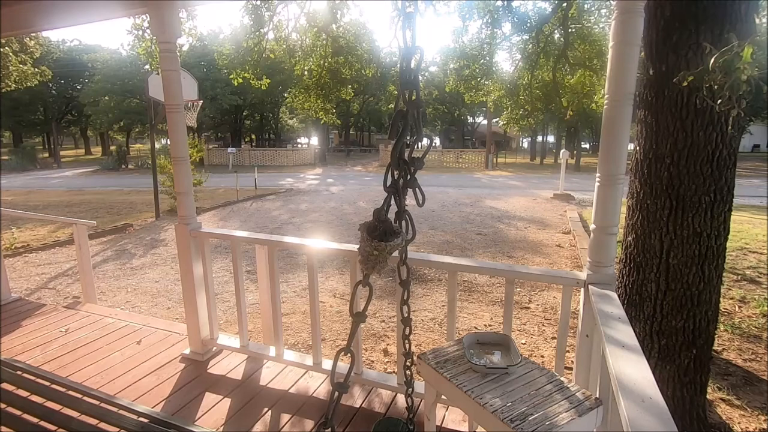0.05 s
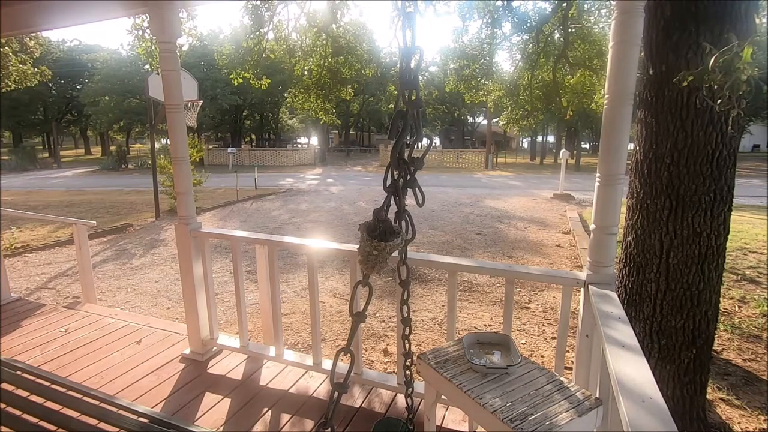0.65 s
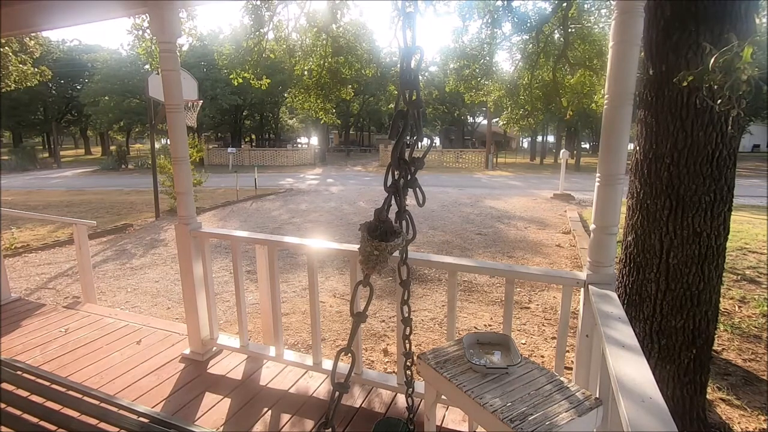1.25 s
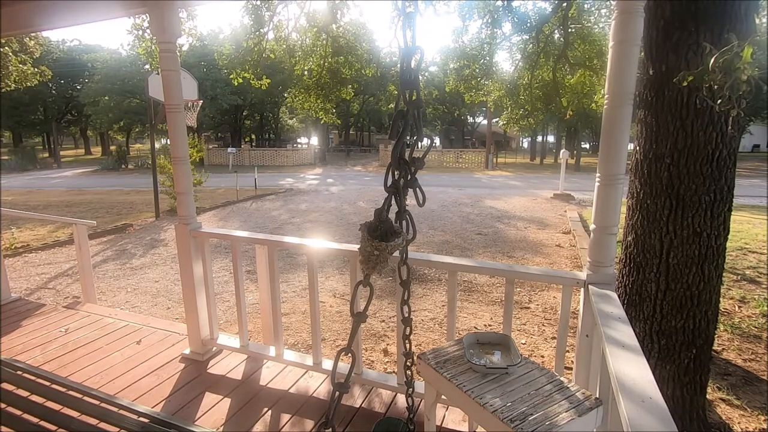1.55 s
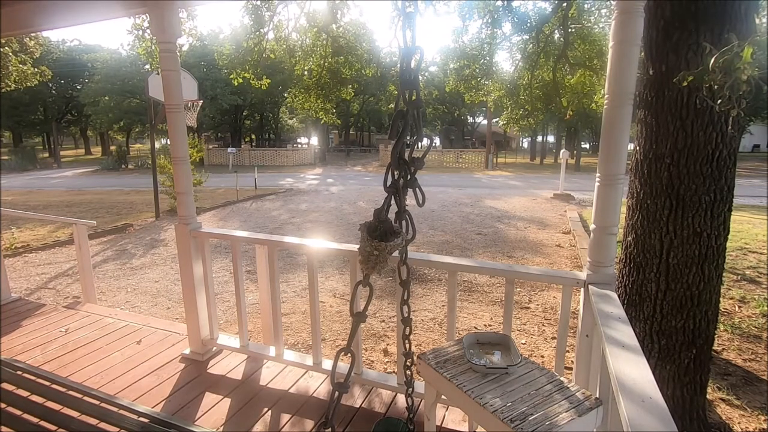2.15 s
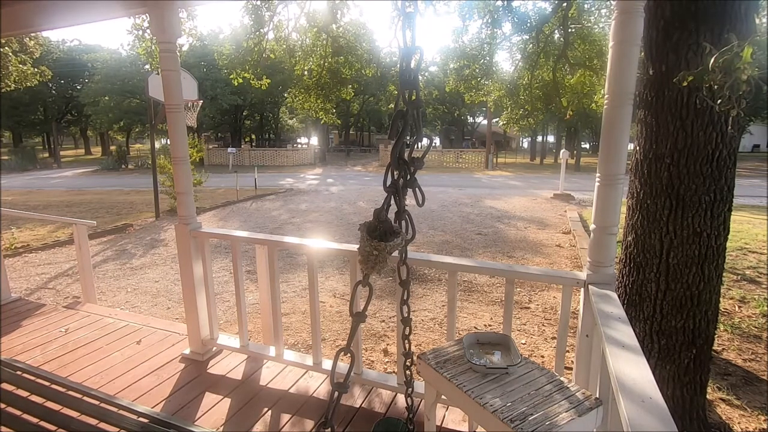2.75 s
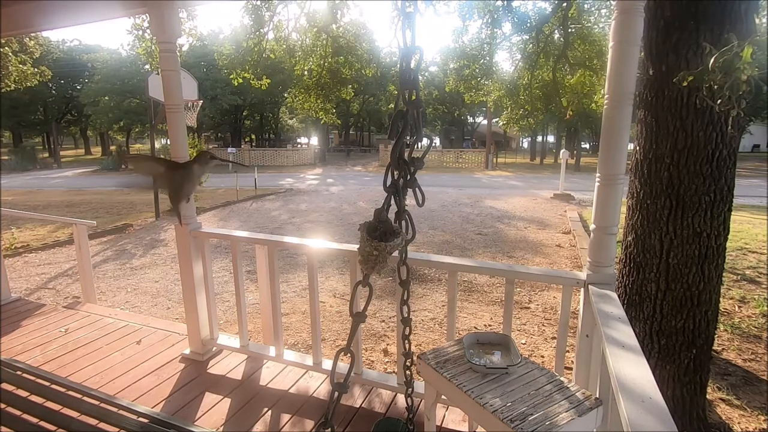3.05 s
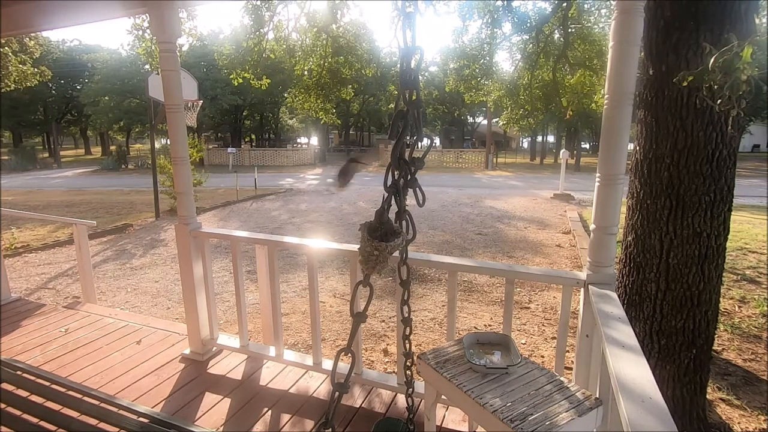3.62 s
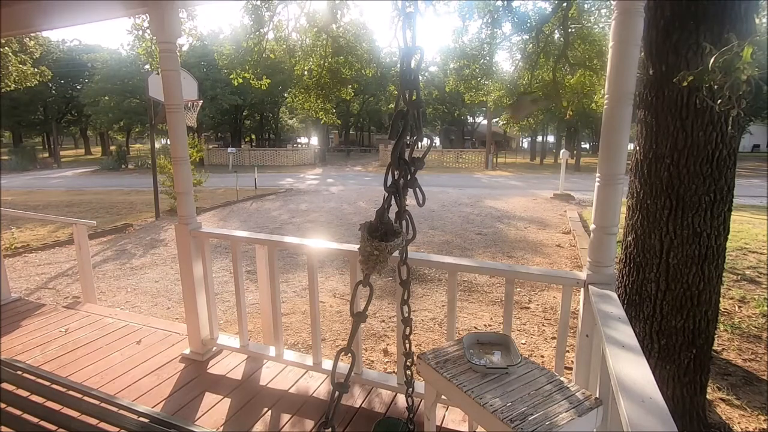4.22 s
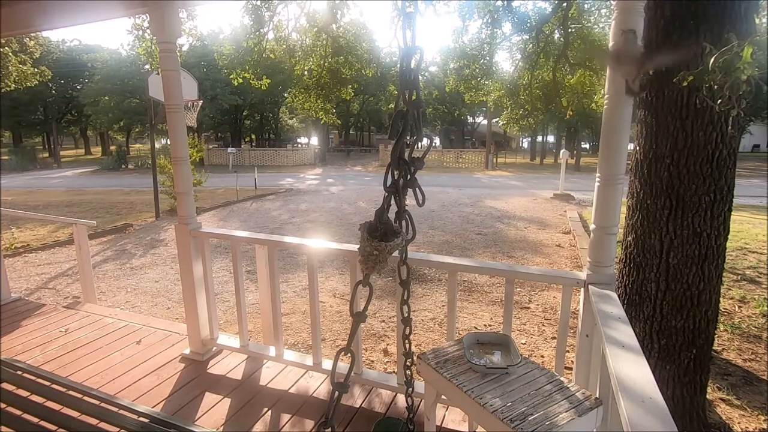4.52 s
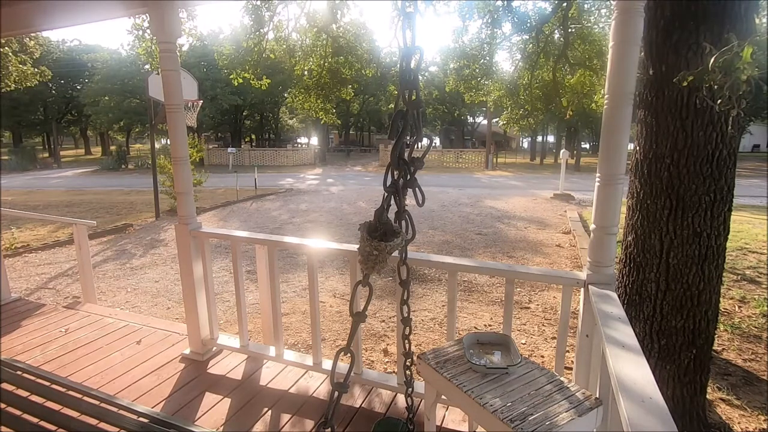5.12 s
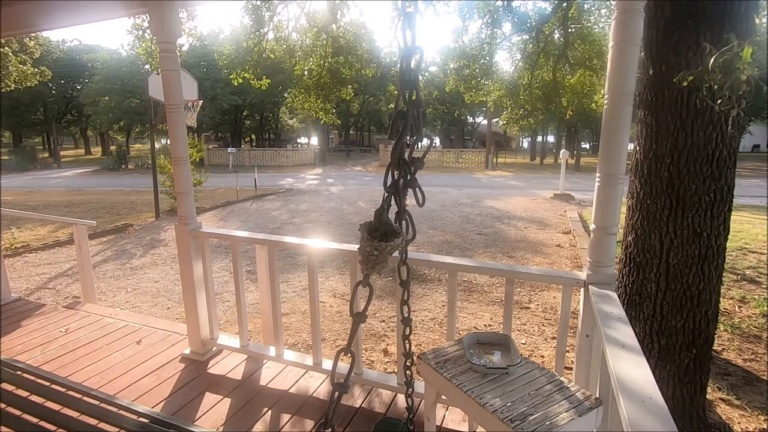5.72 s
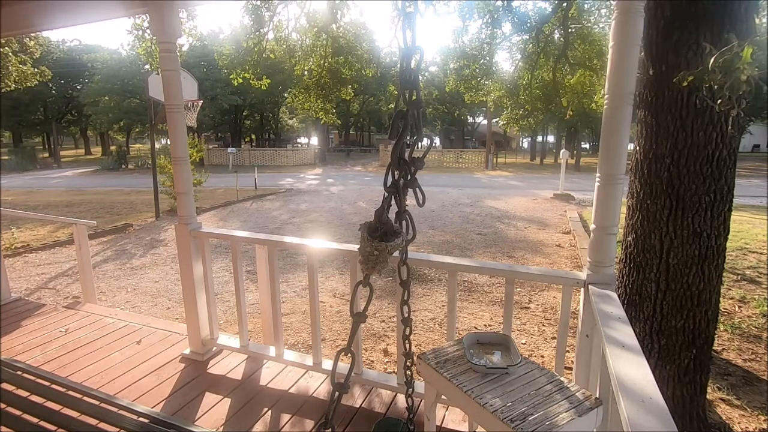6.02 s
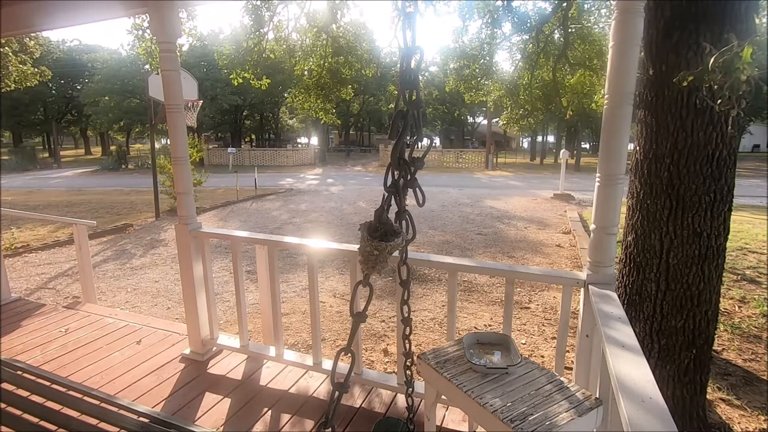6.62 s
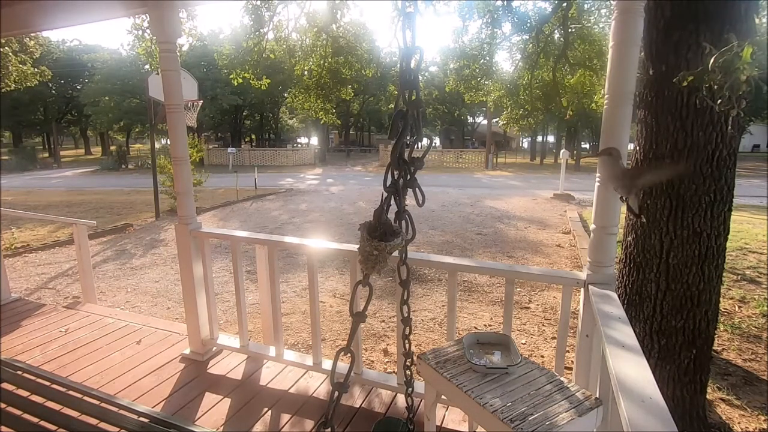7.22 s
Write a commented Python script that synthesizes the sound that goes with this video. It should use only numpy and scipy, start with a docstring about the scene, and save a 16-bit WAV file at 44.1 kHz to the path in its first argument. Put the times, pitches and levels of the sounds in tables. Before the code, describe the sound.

A low, fluttering hum of hummingbird wings comes and goes near the microphone on a quiet outdoor porch. Tiny, sharp falling chips sound all along, sometimes doubled, with a slight echo off the boards. The wings hover close at first, retreat, then come back for their loudest pass, with faint feathery zips in the turns. Behind them are a soft far rumble and a thin insect hiss.

```python
"""A wooden porch on a quiet summer day, with hummingbirds darting about close by.
Each chip (a tiny call) is a short falling whistle with strong overtones, thrown back by the boards.
The wings throb about 47 times a second, and their feathers zip in sharp turns. There are a few dry
ticks. Insects hiss in the trees, with two far calls, over a soft, distant rumble and a faint drone."""
import sys
import numpy as np
from scipy import signal
from scipy.fft import rfft, irfft
from scipy.io import wavfile
from scipy.ndimage import map_coordinates

SR = 44100
rng = np.random.default_rng(int(sys.argv[2]) if len(sys.argv) > 2 else 0)


def transcribe(u):
    """Save the signal u as a 16-bit wav file named by the first command-line argument.

    u: samples, shape (n,) or (channels, n), limited to [-1, 1]; the rate is SR.
    q: integer samples, one column per channel.
    """
    v = np.clip(np.atleast_2d(u).T, -1, 1)
    q = np.round(v * 32767).astype(np.int16)
    wavfile.write(sys.argv[1], SR, q)


N = 320607
T = np.arange(N) / SR

# The birds' calls. The third and fourth harmonics count from the first; pan is left minus right.
# start_s, length_s, start_hz, end_hz, level_db, third_db, fourth_db, pan_db
CHIP_NOTES = [(0.2481, .028, 2744, 2100, -33, 0, -5.5, -1.5),
              (.645, 0.026, 2760, 1990, -33.5, -2, -5.5, 4.5),
              (1.058, 0.023, 2680, 2010, -33.5, -5, -3.5, 7.5),
              (1.795, .027, 2688, 2040, -36, 4.5, -1, 1.5), (2.128, .025, 2693, 2150, -34, 2, -5, 0.5),
              (2.809, 0.026, 2582, 2220, -40, -5, -9, 14), (2.885, 0.027, 2667, 2110, -40.5, -2, -7, 8),
              (3.49, 0.028, 2736, 2110, -39, -2, -13, 4.5), (3.563, 0.03, 2664, 2160, -40.5, 1, -6, 3.5),
              (4.145, 0.028, 2780, 1980, -41.5, -1, -5.5, 2), (4.202, .017, 2440, 2080, -41.5, -1.5, -3, 4),
              (4.686, .029, 2692, 2120, -35.5, 3, -11.5, 3.5),
              (5.1787, .026, 2733, 1950, -31.5, 3, -10.5, 3.5),
              (5.623, .027, 2632, 2065, -30, 3.5, -4.5, -4.3),
              (5.7017, .024, 2683, 2070, -32.5, 5.5, 0.5, -4),
              (6.14, .026, 2677, 2130, -36, 6.5, -0.5, -3.5),
              (6.79, 0.026, 2637, 2180, -41.5, 4.5, -8.5, 2.5),
              (6.869, 0.024, 2670, 2140, -40.5, 3.5, -9, 2.4)]
# How a chip holds its pitch, then drops: share_of_length, share_of_fall
CHIP_SLIDE = [(0, 0.03), (.2, .11), (.54, .6), (.7, 0.805), (1, 0.98)]
# Loudness of the hovering hum as the birds come and go: time_s, level_db
HOVER_LEVELS = [(0, -42), (.5, -37.5), (.85, -35), (1.45, -30), (1.55, -41), (1.65, -32.5), (2.13, -37.5),
                (2.2, -43.5), (2.8, -61), (3.7, -61), (4.76, -49.5), (4.83, -31.5), (5.3, -27),
                (5.72, -28.5), (5.88, -46), (6.05, -37), (6.27, -34.5), (6.38, -64), (6.8, -76),
                (7.27, -57)]
# Spurts of faster, harder wingbeats. The octave is the tone at twice the beat rate.
# start_s, length_s, beat_hz, gain_db, octave_gain_db
WING_SPURTS = [(0.241, 0.13, 49.5, 5, 3), (.545, 0.0599, 52.3, 1, 8), (0.674, 0.0976, 53, 6.5, 2),
               (0.882, 0.056, 50.8, 1, 0.5), (0.987, .17, 44.5, 3.5, -2.5), (1.227, 0.12, 50, -1.5, 2.5),
               (1.38, 0.10076, 53.6, 5, 5.5), (1.836, .07, 48.7, 2.5, 4), (2.257, 0.086, 45.4, 9.5, 8.5),
               (2.503, 0.11, 50.5, 7, 2), (3.03, .2, 52.7, 7, 10.5), (3.512, .1, 57, 9, 5),
               (3.75, 0.066, 52, 7, 8.5), (4.32, 0.15, 49.5, 5.5, -5), (4.543, 0.16, 50.4, 2, 3),
               (4.798, 0.11, 54, 7, 4), (5.082, 0.071, 49.8, -1.5, 2.5), (5.17, .1, 47.2, 2.5, 5),
               (5.603, 0.17, 46.4, 3.5, 3.5), (5.759, 0.071, 51, -4, 10), (6.121, .17, 48, 0, 5.5),
               (6.437, 0.093, 46, 5, 10.5), (6.931, 0.14, 55.2, 21.5, 1.5)]
# The side the birds fly on: time_s, pan_db
WING_SIDES = [(0, 0.5), (.2, -3), (.8, 4.5), (1.56, -3.5), (2.11, -2.5), (2.35, 4.5), (4.65, 0), (4.98, -4),
              (5.9, -4), (6.5, 0.5), (7.27, 0)]
# Feather zips in sharp turns: start_s, length_s, pitch_hz, level_db, air_over_zip_db
FEATHER_ZIPS = [(0.3, 0.09, 3770, -68.5, 7.5), (0.554, 0.091, 3600, -62, -17), (0.697, 0.071, 3520, -70, 8),
                (1.258, 0.14, 3662, -62, -4), (1.37, 0.14, 4070, -62.5, 5), (1.865, 0.029, 3650, -64, 0),
                (2.263, 0.047, 3780, -68, 0), (4.792, 0.12, 3922, -67, 8.5), (6.172, 0.094, 3917, -62, 1.5),
                (6.405, 0.088, 3683, -67.5, 1)]
# The space under the roof booms a little: pitch_hz, width_hz, gain_db
ROOF_BOOM = [(149.6, 156, -7.5), (221.4, 95, -3.5)]
# Echoes off the porch boards: left_delay_s, right_delay_s, gain_db
BOARD_ECHOES = [(.0064, 0.0079, -11.5), (.0093, 0.0097, -19), (0.0182, 0.012, -19.5)]
# Small dry ticks: start_s, level_db, pitch_hz
DRY_TICKS = [(3.727, -47, 2302), (4.2045, -41, 4500), (5.6005, -45, 3580)]
# Bands of hiss that make up the insect chorus: pitch_hz, width_hz, relative_db
INSECT_BANDS = [(2467, 115, 5), (2630, 24, 11), (3196, 82, 7), (3420, 420, -2.5), (3690, 630, -2),
                (4320, 2200, -4), (3230, 2040, 0.5), (5800, 2700, -7.5), (7750, 1387, -3.5)]
# Loudness of the whole chorus: time_s, level_db
INSECT_LEVELS = [(0, -68.5), (2.6, -69), (2.85, -58.5), (3.05, -57.5), (4.7, -58), (4.88, -62),
                 (5.0, -64.5), (6.4, -70), (6.8, -64.5), (7.0, -60), (7.27, -62.5)]
# Thin, far calls from the trees: start_s, length_s, pitch_hz, level_db
TREE_CALLS = [(3.79, 0.13, 1173, -67), (3.923, 0.27, 1078, -61.5)]
# Open air and distant rumble, from bass to treble: pitch_hz, relative_db
AIR_SPECTRUM = [(25, -10.5), (50, 0.5), (110, 0.5), (200, -3), (295, -2.5), (345, -9.5), (650, -12),
                (1000, -22.5), (1800, -27), (3500, -31), (5500, -35.5), (8000, -36.5), (10000, -96.5),
                (15000, -100)]
# Tones of a far-off drone: pitch_hz, width_hz, level_db
DRONE_TONES = [(290.6, 9.3, -59), (645, 7.1, -68.5), (744, 6.8, -80.5), (808, 5.1, -72.5)]

HOVER_HZ = 46.1  # wingbeats a second in a steady hover
CLOSE_DB = -30  # level of the hum at a close pass


def chips(waver=0.013, rasp=0.023, attack_s=0.0013, release_s=0.00082, beak_hz=7400, beak_width_hz=900):
    """A bird's voice box slides down, rough in mid-note. Returns the direct sound and the porch's share."""
    direct, to_porch = np.zeros((2, N)), np.zeros(N)
    t = np.arange(2048) / SR
    for start_s, length_s, start_hz, end_hz, level_db, third_db, fourth_db, pan_db in CHIP_NOTES:
        progress = np.clip(t / length_s, 0, 1)
        hz = start_hz + (end_hz - start_hz) * np.interp(progress, *np.transpose(CHIP_SLIDE))
        hz *= 1 - 0.16 * progress ** 12  # a last flick downward
        middle = np.exp(-((progress - .42) / 0.49) ** 2)
        wobble = waver * wander(219, len(t))
        roughness = rasp * gain(rng.uniform(-4.1, 3.3)) * middle * wander(2648, len(t))
        hz *= 1 + wobble + roughness
        phase = 2 * np.pi * np.cumsum(hz) / SR
        swell = (1 - np.exp(-t / attack_s)) * np.clip((length_s - t) / release_s, 0, 1)
        swell *= np.exp(-((progress - 0.38) / 0.42) ** 2 / 2)
        # the porch fills almost equally wherever the bird is,
        # but a beak turned toward us sounds brighter and sends less to the boards
        echo_gain = gain(-33.5 + 0.29 * (level_db + 36) - 0.57 * third_db)
        lag_s = np.array([[1], [-1]]) * 4e-6 * pan_db  # the nearer ear hears it first
        for harmonic, harmonic_db in enumerate([0, -1.9, third_db, fourth_db, fourth_db - 18], 1):
            # overtones bloom with effort, and the beak boosts any that pass the pitch it rings at
            beak_db = 5 / (1 + ((harmonic * hz - beak_hz) / beak_width_hz) ** 2)
            shape = swell ** (1 + 0.35 * np.log(harmonic)) * gain(beak_db)
            shape *= gain(harmonic_db) / np.sqrt(np.sum(shape ** 2) / (2 * length_s * SR))
            sides = pan(pan_db + 2.3 * np.log2(harmonic / 2))  # the left ear gets more treble
            tone = np.sin(harmonic * (phase + 2 * np.pi * hz * lag_s))
            add(direct, start_s, sides * gain(level_db) * shape * tone)
            echo_share = min(harmonic / 2, 1) ** .7
            add(to_porch, start_s, echo_gain * echo_share * shape * np.sin(harmonic * phase))
        # a brief, high fizz of noise in the middle of each chip
        fizz = unit(band(rng.standard_normal(len(t)), 13000, 3400)) * middle * swell * gain(fourth_db - 18)
        add(direct, start_s, pan(pan_db) * gain(level_db) * fizz)
        add(to_porch, start_s, echo_gain * fizz)
    return direct, to_porch


def flight(ramp_s=.04, rest_s=.1, rest_share=.35):
    """A restless hover with spurts. Returns beat count, beat rate, hum level and the octave's boost."""
    lurch = wander(22)  # a harder beat is also a faster one
    beat_hz = HOVER_HZ * (1 + .009 * lurch)
    hum_db = curve(HOVER_LEVELS) + 0.8 * lurch
    boost_db = 0
    for start_s, length_s, spurt_hz, gain_db, octave_gain_db in WING_SPURTS:
        push = np.clip(np.minimum(T - start_s, start_s + length_s - T) / ramp_s + .5, 0, 1)
        # after a spurt the bird eases off for a moment
        effort = push - rest_share * np.sin(np.pi * np.clip((T - start_s - length_s) / rest_s, 0, 1))
        beat_hz += effort * (spurt_hz - HOVER_HZ)
        hum_db += effort * gain_db
        boost_db += push * octave_gain_db
    hum_db += 0.12 * np.clip(CLOSE_DB - hum_db, 0, 25) * wander(35)  # firm close by, flickering far off
    beats = np.cumsum(beat_hz * (1 + 0.013 * wander(40))) / SR  # no two beats are quite alike
    return beats, beat_hz, hum_db, boost_db


def wings(beats, beat_hz, hum_db, boost_db):
    """The wings' lift swings once a beat (hum) and once a stroke (octave); each downstroke adds a slap."""
    def pulse(place, width):
        """A smooth bump in every beat; place and width are shares of a beat."""
        return np.exp(-(((beats - place + .5) % 1 - .5) / width) ** 2 / 2)
    slap_width = 0.04 * (47 / beat_hz) ** 0.58  # sharper when the bird speeds up
    # the upstroke shifts and changes strength as the bird turns
    upstroke = 0.52 * (1 + 0.5 * wander(10)) * pulse(0.6377 + 0.062 * wander(5), 0.051)
    wake = 0.5 * pulse(0.11, 2 * slap_width)
    slap = -pulse(0, slap_width) - wake - upstroke
    slap = signal.sosfiltfilt(signal.butter(6, 120, "high", fs=SR, output="sos"), slap)
    slap = slap + sum(gain(db) * band(slap, hz, width_hz) for hz, width_hz, db in ROOF_BOOM)
    swish = unit(band(rng.standard_normal(N), 295, 254) * (.5 + pulse(0, 0.35)))
    slap = unit(slap) * gain(wander(45)) + gain(-18) * swish
    slap_db = follow_hum(hum_db, close_db=-37, slope=0.73) + 0.46 * (beat_hz - HOVER_HZ)
    hum = -np.sqrt(2) * np.cos(2 * np.pi * (beats + 0.081)) * gain(hum_db)
    octave_db = follow_hum(hum_db, close_db=-38, slope=0.73) + boost_db + 3.5 * wander(22)
    octave = -np.sqrt(2) * np.cos(4 * np.pi * beats + .25 * wander(10)) * gain(octave_db)
    return (hum + octave + slap * gain(slap_db)) * pan(curve(WING_SIDES))


def feathers(beats, hum_db):
    """In a hard turn the wing tips whistle briefly on every beat, along with a rush of air."""
    pulses = unit(np.exp(4.5 * np.cos(2 * np.pi * beats) + .25 * wander(50)))
    treble_cut = signal.butter(4, 9500, fs=SR, output="sos")
    air = signal.sosfilt(treble_cut, band(stereo_noise(0.55), hz=3100, width_hz=6000))
    air = unit(air * np.sqrt(pulses + 0.73))
    noise, zips = stereo_noise(1.0), np.zeros((2, N))
    for start_s, length_s, hz, level_db, air_db in FEATHER_ZIPS:
        turn = slice(int(start_s * SR), int((start_s + length_s) * SR))
        whistle = unit(band(noise[:, turn], hz, width_hz=750)) * pulses[turn]
        whirr = whistle + gain(air_db) * air[:, turn]
        add(zips, start_s, gain(level_db) * whirr * signal.windows.tukey(whirr.shape[1], .3))
    # even in level flight the feathers sizzle faintly with each beat
    sizzle = unit(band(stereo_noise(0.051), hz=9700, width_hz=2200) * (1 + 0.26 * pulses))
    return zips + sizzle * gain(follow_hum(hum_db, close_db=-72.5, slope=.28))


def porch(sound, roof_db=-14, roof_fade_s=0.16, yard_db=-25, yard_fade_s=0.35, gap_s=0.0018):
    """Sound bounces off the boards, scatters quickly under the roof and lingers faintly in the yard."""
    t = np.arange(SR // 2) / SR
    echoes = np.zeros((2, len(t)))
    for db, fade_s in ((roof_db, roof_fade_s), (yard_db, yard_fade_s)):
        tail = rng.standard_normal(echoes.shape) * gain(-60 * t / fade_s) * (t > gap_s)
        echoes += gain(db) * tail / np.sqrt(np.sum(tail ** 2) / 2)
    for left_s, right_s, db in BOARD_ECHOES:
        for ear, delay_s in enumerate((left_s, right_s)):
            smear = rng.standard_normal(SR // 700)  # rough, slatted wood blurs each echo
            add(echoes[ear], delay_s, gain(db) * smear / np.linalg.norm(smear))
    brighter = signal.lfilter([1, -0.063], 1, sound)  # thin rails and posts scatter treble best
    return signal.fftconvolve(brighter[None], echoes, axes=1)[:, :N]


def ticks(decay_s=0.0066):
    """Each dry tick is a burst of noise that dies away at once."""
    out, t = np.zeros((2, N)), np.arange(SR // 20) / SR
    for start_s, level_db, hz in DRY_TICKS:
        burst = unit(band(stereo_noise(0.68)[:, :len(t)], hz, 0.95 * hz))
        add(out, start_s, gain(level_db) * burst * np.exp(-t / decay_s))
    return out


def insects():
    """A chorus in the trees: flickering bands of hiss that swell and fade together."""
    chorus = sum(gain(db + wander(25)) * band(stereo_noise(0.41), hz, width_hz)
                 for hz, width_hz, db in INSECT_BANDS)
    return unit(chorus) * gain(curve(INSECT_LEVELS))


def far_calls():
    """Thin calls from the trees: noise so narrow that it sounds like a note."""
    out = np.zeros((2, N))
    for start_s, length_s, hz, level_db in TREE_CALLS:
        call = unit(band(stereo_noise(0.23)[:, :int(length_s * SR)], hz, width_hz=46.3))
        add(out, start_s, gain(level_db) * call * np.sqrt(np.hanning(call.shape[1])))
    return out


def open_air(level_db=-46, split_hz=380):
    """Soft distant rumble and open air; the bass is nearly the same in both ears."""
    hz = np.maximum(np.arange(N // 2 + 1) * SR / N, 1)
    table_hz, table_db = np.transpose(AIR_SPECTRUM)
    colour = gain(np.interp(np.log(hz), np.log(table_hz), table_db))
    bass_share = 1 / (1 + (hz / split_hz) ** 4)
    bass = rfft(stereo_noise(1.0)) * np.sqrt(bass_share)
    treble = rfft(stereo_noise(0.18)) * np.sqrt(1 - bass_share)
    air = unit(irfft((bass + treble) * colour, N))
    return air * gain(level_db - 0.35 * wander(3.975)) * pan(-1.24)


def drone():
    """Faint, wavering tones from far away."""
    return sum(gain(db) * unit(band(stereo_noise(1.0), hz, width_hz)) for hz, width_hz, db in DRONE_TONES)


def follow_hum(hum_db, close_db, slope):
    """Level in dB of a wing sound that fades more slowly with distance than the hum does."""
    return close_db + slope * (hum_db - CLOSE_DB)


def gain(db):
    """Turn decibels into a number to multiply by."""
    return 10 ** (np.asarray(db) / 20)


def unit(x):
    """Scale a sound to an average power of 1."""
    return x / np.sqrt(np.mean(x ** 2))


def curve(rows):
    """Join (time, value) points with straight lines."""
    return np.interp(T, *np.transpose(rows))


def pan(db):
    """Left and right gains, db apart, with the same total power."""
    sides = gain(np.array([np.atleast_1d(db), -np.atleast_1d(db)]) / 2)
    return sides / np.sqrt(np.mean(sides ** 2, axis=0))


def add(out, start_s, x):
    """Mix x into out, starting at start_s."""
    i = max(int(start_s * SR), 0)
    out[..., i:i + x.shape[-1]] += x[..., :N - i]


def band(x, hz, width_hz):
    """Keep the sound near one pitch; filtering twice makes the edges steep."""
    b, a = signal.iirpeak(min(hz, .45 * SR), hz / width_hz, fs=SR)
    return signal.lfilter(b, a, signal.lfilter(b, a, x))


def wander(rate_hz, size=N):
    """A smooth random wiggle, mostly between -1 and 1."""
    points = rng.standard_normal(size // 8 + 8)
    return map_coordinates(points, [np.arange(size) * rate_hz / SR], order=2, mode="mirror")


def stereo_noise(likeness):
    """White noise for two ears: likeness 0 is unrelated, 1 is identical."""
    mid, side = rng.standard_normal((2, N))
    return (np.sqrt(1 + likeness) * mid + np.sqrt(1 - likeness) * side * np.array([[1], [-1]])) / np.sqrt(2)


def scene(wing_echo_db=-6):
    """Birds on the porch in front of the quiet yard."""
    beats, beat_hz, hum_db, boost_db = flight()
    calls, calls_to_porch = chips()
    throb = wings(beats, beat_hz, hum_db, boost_db)
    echoes = porch(calls_to_porch + gain(wing_echo_db) * throb.mean(axis=0))
    birds = calls + throb + echoes + feathers(beats, hum_db)
    return birds + ticks() + insects() + far_calls() + open_air() + drone()


def record(dry):
    """Cut the very highest treble, above 15200 Hz."""
    return signal.sosfilt(signal.ellip(8, .2, 70, 15200, fs=SR, output="sos"), dry)


dry = scene()
out = record(dry)
transcribe(out)
```